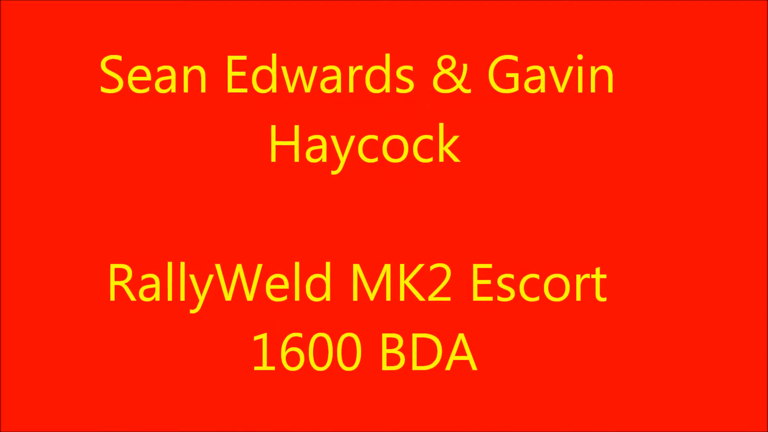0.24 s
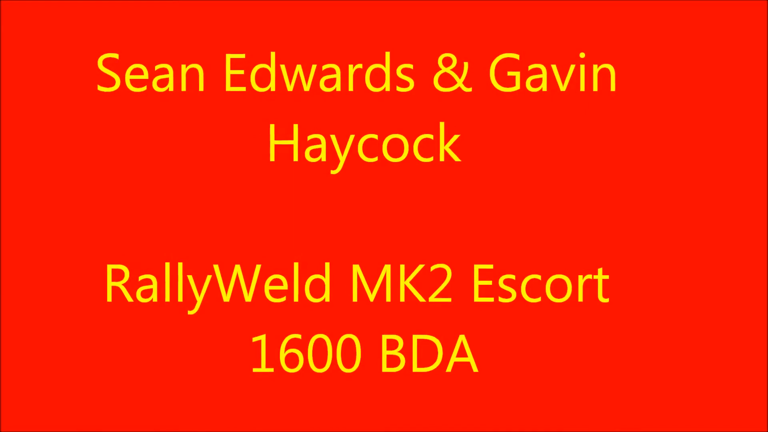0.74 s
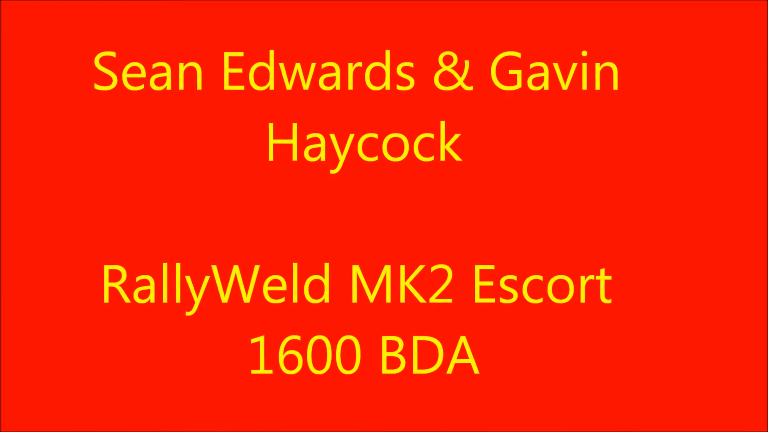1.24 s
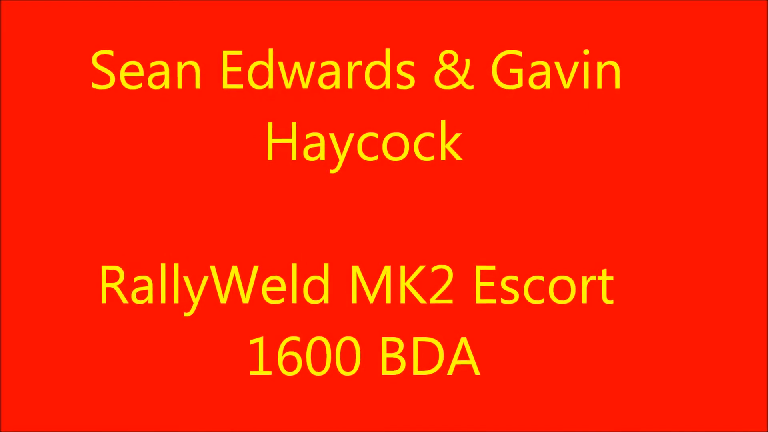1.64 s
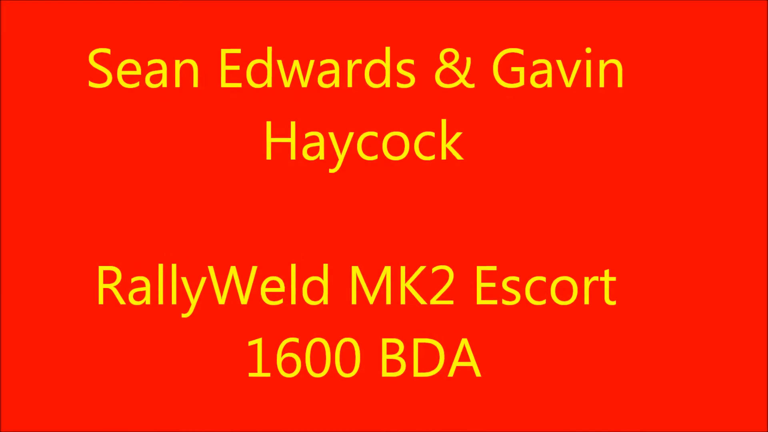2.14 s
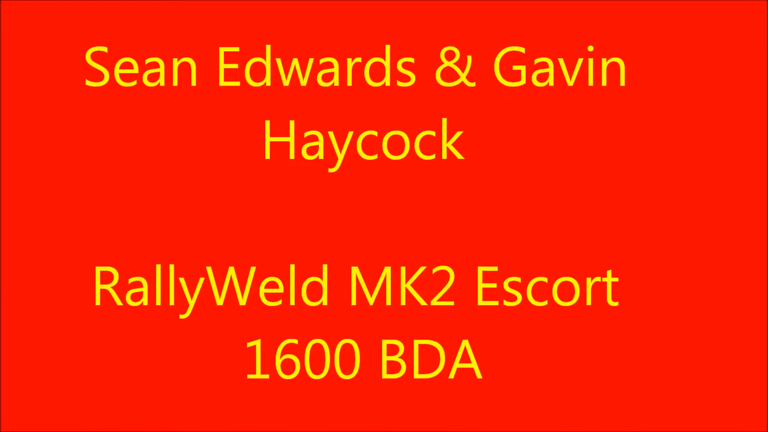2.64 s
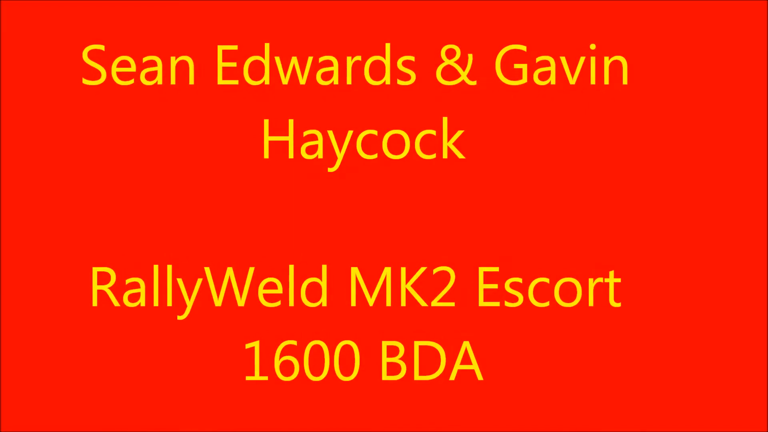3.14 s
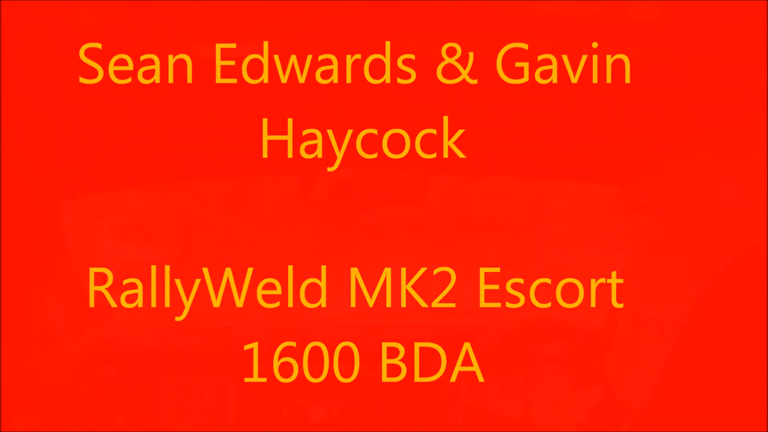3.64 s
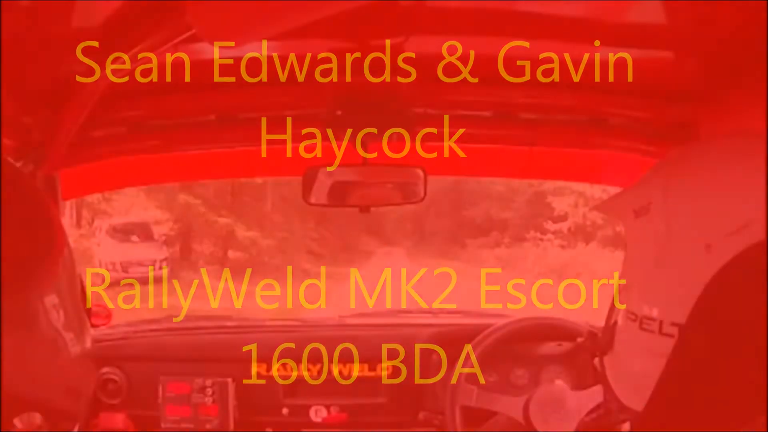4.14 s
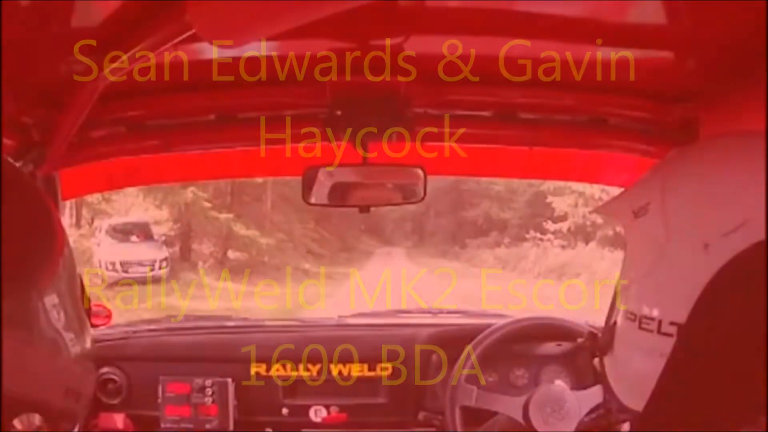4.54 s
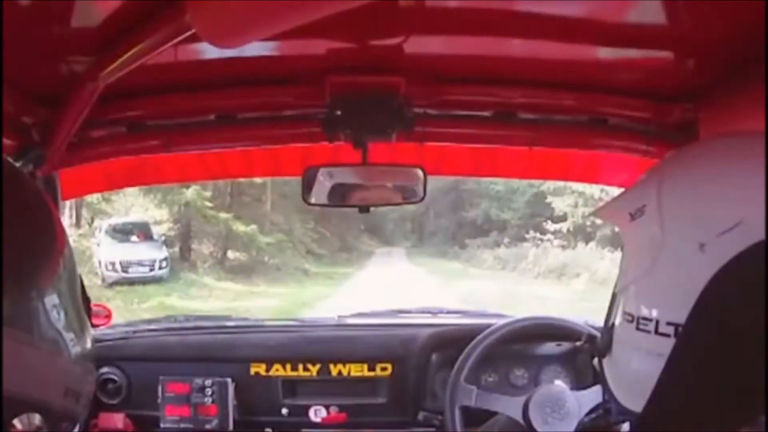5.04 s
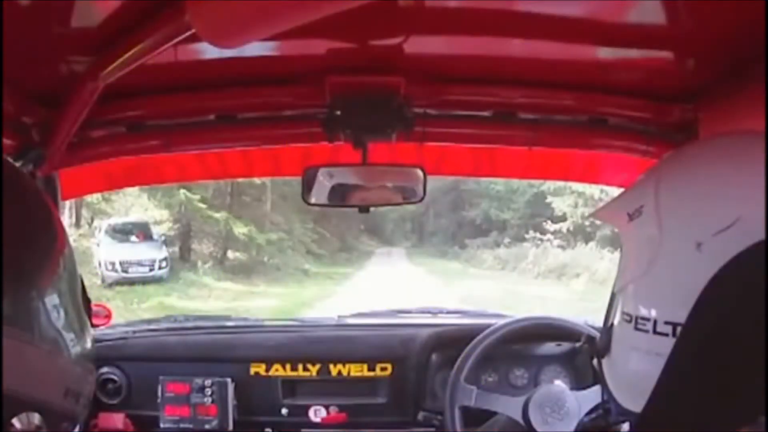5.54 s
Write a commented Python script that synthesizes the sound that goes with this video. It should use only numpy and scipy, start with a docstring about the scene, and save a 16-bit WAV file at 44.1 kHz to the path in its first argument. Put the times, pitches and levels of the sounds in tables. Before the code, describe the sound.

From the first instant a four-cylinder competition engine is at full load, heard inside a bare, resonant metal cabin. Over about four seconds its pitch climbs by more than an octave in one unbroken gear, wavering and surging slightly as the wheels slip. The growl is throaty and uneven, topped by a bright intake rasp. Thin gear tones sing mostly between 0.4 and 1.5 s, and one faint tick comes at 0.4 s. Gravel hiss grows with speed, with a stronger spray around 3.7 to 4 s. From about 4.4 s the run drops away rapidly, vanishing by 5 s, while a standing car fades in: duller, lower, rougher and boomy. The throttle is blipped at 4.4 to 4.7 s and higher at 5.0 to 5.3 s, with short bright hisses and soft low thuds around them. The revs then sink with a burbling boom near 5.6 s over low body rumble.

```python
"""Inside a stripped rally car, a four-cylinder engine pulls hard through one long gear.
Its note and growl are tones locked to the crank; timing gears sing, and coloured noise makes intake rasp and gravel hiss.
That run fades into the car standing at the start, where the throttle is blipped twice.
There the engine shakes cabin resonances, which gives a duller, rougher note with a boom.
Low body rumble, a few thuds, short bright hisses and one tick complete the sound."""
import sys
import numpy as np
from scipy import signal
from scipy.fft import rfft, irfft
from scipy.io import wavfile

SR = 44100
rng = np.random.default_rng(int(sys.argv[2]) if len(sys.argv) > 2 else 0)


def dump(signal):
    """Clip the signal to [-1, 1] and save it as 16-bit WAV at the path in sys.argv[1]."""
    limited = np.clip(np.atleast_2d(signal).T, -1, 1)
    pcm = np.round(limited * 32767).astype(np.int16)
    wavfile.write(sys.argv[1], SR, pcm)


N = 256220
T = np.arange(N) / SR  # time in seconds
BINS = np.fft.rfftfreq(N, 1 / SR)  # frequencies in Hz

# Layers that follow the revs are pairs: dB at this many firings per second, dB gained per doubling of the revs.
MID_REVS_HZ = 200
ROAR, KNOCK, CLATTER, GRAVEL = (-33, -2), (-43, .5), (-30.5, 0), (-47.5, 18.7)
BLIP_GROWL, RAGGED, IDLE_CLATTER = (-27, 9.2), (-39.5, 2.3), (-45.5, 3.3)


# Loudness of the whole run as it fades out. Each row: time in seconds, level in dB.
RUN_LEVEL = [(0, -1), (2.6, 0.5), (3.7, -1.5), (3.98, 3), (4.36, -4.5), (4.64, -4.5), (4.76, -21),
             (5.0, -73)]


def stage_engine(speed, firings, low_cut_hz=92):
    """The engine at full load: its deep layers waver together, and the rasp and knocks lie on top."""
    engine = stage_note(speed, firings) + stage_growl(speed, firings) + roar(speed, firings)
    engine = engine + from_db(1.0) * gear_whine(firings, flutter=.68, chatter=.45, lope=.4)
    # ruts jolt the driven wheels, so the load wavers
    engine = engine * from_db(.55 * drift(8))
    low_cut = signal.butter(6, low_cut_hz, "high", fs=SR, output="sos")
    engine = signal.sosfilt(low_cut, engine)
    knocks = with_revs(speed, KNOCK) * knock(firings)
    return from_db(in_time(RUN_LEVEL)[0]) * (engine + knocks + intake_rasp(speed, firings))


# Harmonics of the firing pulse. Each row: multiple of the firing rate, level in dB before the pipe.
PULL_HARMONICS = [(1.0, -6.0), (2.0, -7.5), (3.0, 2.5), (4.0, -4.5)]
# How strongly the exhaust pipe passes each pitch. Each row: frequency in Hz, level in dB.
PIPE_CURVE = [(115.0, -20), (150.0, -22), (200.0, -15), (228.0, -26.5), (252.0, -15.5), (280.0, -22.0),
              (310.0, -20.0), (350.0, -26), (400.0, -30.5), (490.0, -22), (535.0, -23.5), (590.0, -36),
              (645.0, -27.5), (700.0, -38), (780.0, -43), (840.0, -43.5), (920.0, -36.5), (1100.0, -42.5)]


def stage_note(speed, firings):
    """Firing harmonics sweep through the resonances of the exhaust pipe, with a rough edge."""
    note = partials(speed, firings, PULL_HARMONICS, PIPE_CURVE, unsteady=.15, scatter=.8)
    return note * (1 + .11 * drift(33))


# Growl of unequal cylinders during the run. Each row: time in seconds, level in dB.
GROWL_LEVEL = [(0.0, -21.5), (0.6, -29), (1.0, -26.5), (1.5, -19.5), (2.1, -22.5), (2.6, -23.5),
               (3.0, -18.5), (3.5, -22.5), (3.9, -35.0), (4.4, -38.5)]
# Tones in that growl. Each row: multiple of the firing rate, level in dB before the cabin.
GROWL_TONES = [(0.75, 3.5), (1.25, 7.0), (1.5, -2), (1.75, 13.0), (2.25, 4.5), (2.5, -14), (2.75, -0.5),
               (3.25, 0), (3.5, 3), (3.75, 0.5), (4.25, 1.0), (4.5, -4), (4.75, -3), (5.0, -8.5),
               (5.25, -1.5), (5.5, 0), (5.75, -6.0), (6.0, -16), (6.25, -5), (6.5, -8.5), (6.75, -9.5),
               (7.0, -12)]
# How strongly the cabin passes these tones as they sweep. Each row: frequency in Hz, level in dB.
CABIN_CURVE = [(85.0, -33), (130.0, -25.0), (205.0, -23), (225.0, -20.5), (255.0, -7.5), (285.0, -11),
               (310.0, -22), (340.0, -12), (400.0, -31.5), (440.0, -23.5), (480.0, -28), (530.0, -13.5),
               (570.0, -16.5), (620.0, -15.5), (680.0, -13.5), (780.0, -20.5), (900.0, -38),
               (1070.0, -11.5), (1250.0, -28), (1400.0, -35), (1700.0, -35.0)]


def stage_growl(speed, firings):
    """Unequal cylinders repeat once per engine cycle, which adds tones mostly between the firing harmonics."""
    tones = partials(speed, firings, GROWL_TONES, CABIN_CURVE, unsteady=.15, scatter=.85)
    return from_db(in_time(GROWL_LEVEL)[0]) * tones


# Extra swells and sags of single tones during the run.
# Each row: middle in seconds, half length in seconds, multiple of the firing rate, change in dB.
RUN_SWELLS = [(0.04, 0.11, 4.5, 8.2), (0.11, 0.16, 5.0, 15), (0.15, 0.08, 4.0, 5), (0.23, 0.41, 4.25, 13.6),
              (0.24, 0.24, 4.75, 13), (0.35, 0.15, 1.75, -13), (0.36, 0.67, 3.25, 17.5),
              (0.51, 0.8, 3.75, 14), (0.58, 0.15, 1.0, 4), (0.82, 0.55, 2.75, 16.5),
              (0.87, 0.6, 3.0, -25.5), (0.91, 0.39, 4.25, -16.5), (1.59, 0.13, 3.25, -8),
              (1.93, 0.11, 5.5, 4.5), (1.96, 0.16, 3.0, -8), (1.99, 0.53, 1.75, -16.5),
              (2.15, 0.15, 6.25, 13), (2.15, 0.16, 2.25, 10), (2.2, 0.16, 3.75, 8), (2.35, 0.25, 3.0, 1.5),
              (2.44, 0.22, 2.0, -24), (2.46, 0.15, 1.0, 4.5), (2.51, 0.18, 4.0, 8), (2.55, 0.3, 2.75, 10.5),
              (2.85, 0.27, 5.25, 14.5), (2.98, 0.31, 1.5, -21), (3.13, 0.11, 4.25, -13.5),
              (3.13, 0.16, 1.75, -18.1), (3.35, 0.33, 2.5, 10.8), (3.66, 0.077, 2.75, 13.2),
              (3.76, 0.081, 2.0, 8), (3.93, 0.073, 1.0, 4), (4.09, 0.031, 2.0, -8),
              (4.1, 0.095, 0.75, -14.5), (4.15, 0.51, 0.75, 21), (4.26, 0.055, 1.0, 7.1),
              (4.3, 0.26, 3.0, 13), (4.34, 0.15, 2.0, 7.5), (4.41, 0.05, 1.0, -15)]


def partials(speed, firings, orders, response, unsteady, scatter):
    """Tones locked to the crank rise and fall as they sweep through a response; near-equal phases make a throb."""
    hz, response_db = np.transpose(response)
    out = 0
    for multiple, db in orders:
        multiple = np.round(4 * multiple) / 4  # whole turns per four-firing cycle
        level = db + np.interp(np.log(multiple * speed), np.log(hz), response_db)
        level = level + swells_of(RUN_SWELLS, multiple)
        gain = from_db(level) * (1 + unsteady * drift(10.0))
        phase = scatter * rng.standard_normal()
        out = out + gain * np.cos(2 * np.pi * multiple * firings + phase)
    return out


# Tone colour of the roar. Each row: frequency in Hz, strength in dB per Hz.
ROAR_TINT = [(70, -18), (115, -7), (170, -7), (260, 0), (400, -9.5), (550, -0.5), (750, -3), (880, -8),
             (1080, -3), (1400, -7), (1900, -24)]


def roar(speed, firings):
    """Repeating shocks and rushing air, the roar that the engine pushes through the floor."""
    return with_revs(speed, ROAR) * clatter(firings, ROAR_TINT, regular=1.0, pulsing=0.27, lope=0.15)


# Tone colour of the rasp. Each row: frequency in Hz, strength in dB per Hz.
RASP_TINT = [(900, -27.5), (1300, -12.5), (1620, -9), (2000, -6), (2400, -2.5), (2830, -6.5), (3300, -1),
             (3600, 1), (4300, -8.5), (4900, -12), (5600, -17.5), (6800, -40.5)]


def intake_rasp(speed, firings):
    """Bright repeating shocks and rushing air that pulse with the strokes, with an unsteady level."""
    rasp = clatter(firings, RASP_TINT, regular=.75, pulsing=.14, lope=.1)
    return with_revs(speed, CLATTER) * rasp * from_db(0.68 * drift(7.6))


# Gear tones that swell and pass, with levels before the engine's shared gain.
# Each row: middle in seconds, spread (standard deviation) in seconds, multiple of the firing rate, level in dB.
GEAR_TONES = [(.6, 0.064, 24, -33.5), (0.72, 0.032, 24, -30.5), (0.46, 0.061, 25, -35),
              (0.87, 0.057, 23.75, -38), (0.79, .04, 24.5, -35.5), (1.06, .05, 23.75, -38),
              (1.15, 0.26, 24, -39.5), (.85, .16, 23.25, -36.5), (1.2, 0.044, 25.5, -42),
              (1.46, 0.048, 21, -35), (1.2, .2, 21, -46.5), (0.22, 0.18, 24, -44.5),
              (.96, .15, 12.25, -40.5), (0.62, 0.29, 18.4, -38.5), (3.12, .12, 8.5, -37.5),
              (0.32, .1, 8.5, -42), (2.4, 0.063, 8.5, -44.5)]


def gear_whine(firings, flutter, chatter, lope):
    """Tooth tones swell in turn; backlash and the uneven strokes shake the high ones most."""
    out = 0
    highest = max(row[2] for row in GEAR_TONES)
    for s, spread, multiple, db in GEAR_TONES:
        shake = multiple / highest
        strokes = 1 + shake * lope * np.cos(np.pi * firings / 2 + drift(1.5))
        rise_and_fall = np.exp(-((T - s) / spread) ** 2 / 2)
        gain = from_db(db) * rise_and_fall * (1 + shake * chatter * drift(54)) * strokes
        tone = np.cos(2 * np.pi * multiple * firings + shake * flutter * drift(44))
        out = out + gain * np.sqrt(2) * tone
    return out


# The short thud of the strongest cylinder. Each row: resonance in Hz, width in Hz, level in dB before scaling.
THUD_RESONANCES = [(293, 150, 4), (666, 73, -1)]


def knock(firings):
    """Every fourth firing strikes the exhaust harder and rings out within a few milliseconds."""
    strikes = np.diff(np.floor(firings / 4), prepend=0)
    band = signal.butter(2, [170, 950], "band", fs=SR, output="sos")
    return rms_one(signal.sosfilt(band, resonate(strikes, THUD_RESONANCES)))


def clatter(firings, colour, regular, pulsing, lope):
    """Shocks that repeat each cycle, slowly changing, mixed with rushing air; both pulse with the strokes."""
    change = drift(0.99)  # blends slowly between two shock patterns
    repeating = np.cos(change) * cycle_pattern(firings) + np.sin(change) * cycle_pattern(firings)
    strokes = 1 + pulsing * np.cos(2 * np.pi * firings) + lope * np.cos(np.pi * firings)
    shocks = regular * coloured(cabin(repeating), colour)
    return rms_one((shocks + noise(colour)) * strokes)


def cycle_pattern(firings, size=512):
    """A fixed run of small random shocks that comes round with every engine cycle of four firings."""
    pattern = signal.resample(rng.standard_normal(size // 2), 16 * size)
    place = np.arange(len(pattern)) / len(pattern)
    return rms_one(np.interp(firings / 4 % 1, place, pattern))


def cabin(x, t60_s=0.096, wet=1):
    """Dense short echoes off bare panels: each tone flares and fades as it sweeps across their many peaks."""
    t = np.arange(SR // 5) / SR
    echoes = rng.standard_normal(len(t)) * from_db(-60 * t / t60_s)
    echoes = echoes / np.sqrt(np.sum(echoes ** 2))
    return x + wet * signal.fftconvolve(x, echoes)[:N]


# The standing car fades in. Each row: time in seconds, gain as a plain factor.
START_GAIN = [(3.75, 0.12), (4.25, 0.25), (4.55, 0.62), (5.15, 1)]
THROTTLE_LAG_S, THROTTLE_NOTE_DB, THROTTLE_RAGGED_DB, THROTTLE_CLATTER_DB = 0.074, 2.5, 6, 6


def blipped_engine(speed, firings, throttle, top_hz=790):
    """Without load the charges burn unevenly and shake the cabin, most on the throttle and on the overrun."""
    # after the last blip, unburnt charges burble in the pipe
    burble = from_db(7.5 * swell(5.59, half_length=0.13))
    note = exhaust_note(firings, rough=.2, waver_db=.8)
    growl_gain = with_revs(speed, BLIP_GROWL) * np.sqrt(burble)
    uneven = blip_growl(firings, growl_gain, unsteady=0.6, scatter=0.81)
    top_cut = signal.butter(8, top_hz, fs=SR, output="sos")
    tone = signal.sosfilt(top_cut, note + uneven) * from_db(THROTTLE_NOTE_DB * throttle)
    ragged = ragged_burning(speed, firings, throttle) * burble
    mix = tone + overrun_boom(firings) + ragged + standing_rasp(speed, firings, throttle)
    return in_time(START_GAIN)[0] * mix


# Throttle blips. Each row: opens in seconds, closes in seconds, firings per second reached.
THROTTLE_BLIPS = [(4.39, 4.69, 206), (5.04, 5.33, 264)]
# Revs sinking before the first blip. Each row: time in seconds, firings per second.
SINKING_REVS = [(4.1, 139), (4.36, 118)]
COAST_DRAG_PER_S = .67  # rate at which friction takes the revs back


def blip_controls():
    """Revs climb while the throttle is open and coast down when it shuts; the throttle's effect (0-1) lags."""
    speed, throttle = in_time(SINKING_REVS)[0], np.zeros(N)
    for opens, closes, top in THROTTLE_BLIPS:
        climb = np.interp(T, [opens, closes], [np.interp(opens, T, speed), top])
        coast = np.exp(-COAST_DRAG_PER_S * np.maximum(T - closes, 0))
        speed = np.where(T < opens, speed, climb * coast)
        throttle += (T > opens) & (T < closes)
    r = np.exp(-1 / (THROTTLE_LAG_S * SR))
    return speed, signal.lfilter([1 - r], [1, -r], throttle)


# Harmonics of the standing engine. Each row: multiple of the firing rate, level in dB before the cabin.
STANDING_HARMONICS = [(1, -16.5), (2, -24), (3, -26)]
# Brief swells and sags of single harmonics.
# Each row: middle in seconds, half length in seconds, multiple of the firing rate, change in dB.
STANDING_SWELLS = [(4.67, 0.068, 1, -8), (4.84, 0.064, 1, -14), (5.0, .07, 1, 3.5), (5.29, .04, 1, 2.5),
                   (5.48, 0.05, 1, 0), (5.68, .04, 1, 6.5), (4.51, 0.049, 2, 13.5), (4.87, 0.084, 2, 0),
                   (5.14, 0.043, 2, 6), (5.33, 0.096, 2, -3), (5.5, .06, 2, 4.5), (5.2, 0.15, 3, -3.5),
                   (5.51, 0.043, 3, 11)]
# Cabin resonances of the standing car, also used by the two functions after this one.
# Each row: frequency in Hz, width in Hz, level in dB.
CABIN_RESONANCES = [(55.0, 5.3, -26.5), (128, 4.9, -9), (167, 25, -14.5), (240, 51, -10), (369, 23, -6.5),
                    (469, 31, -7.5), (712, 61, -11)]


def exhaust_note(firings, rough, waver_db):
    """Firing harmonics swell as they cross cabin resonances; higher ones waver more, and the level is rough."""
    note = 0
    for multiple, db in STANDING_HARMONICS:
        level = db + swells_of(STANDING_SWELLS, multiple) + waver_db * multiple * drift(5.2)
        note = note + from_db(level) * np.cos(2 * np.pi * np.round(multiple) * firings)
    return resonate(note, CABIN_RESONANCES) * (1 + rough * drift(30))


# Tones of the standing growl. Each row: multiple of the firing rate, level in dB before gain and cabin.
STANDING_GROWL_TONES = [(0.25, -20), (0.5, -4.5), (0.75, -4.5), (1.25, 0), (1.5, -11), (1.75, -10),
                        (2.25, -4), (2.5, -9), (2.75, -14.5), (3.25, -6), (3.5, 2), (3.75, -5), (4.0, 0)]


def blip_growl(firings, gain, unsteady, scatter):
    """An odd cylinder pulses once per cycle: tones mostly between the harmonics sweep through the resonances."""
    tones = 0
    for multiple, db in STANDING_GROWL_TONES:
        per_cycle = np.round(4 * multiple)
        level = from_db(db) * (1 + unsteady * drift(4.0))
        phase = scatter * rng.standard_normal()
        tones = tones + level * np.cos(2 * np.pi * per_cycle * firings / 4 + phase)
    return resonate(tones * gain, CABIN_RESONANCES)


def ragged_burning(speed, firings, throttle):
    """Uneven burning as flickering puffs of noise that pulse with each firing and shake the cabin."""
    puffs = rng.standard_normal(N) * (1 + .3 * np.cos(2 * np.pi * firings)) * from_db(2.5 * drift(45))
    # tone colour: frequency in Hz, strength in dB
    tint = [(30, -12.5), (100, -7.5), (300, -2.0), (700, -1.0), (1000, -6), (2000, -25.5)]
    ragged = coloured(resonate(puffs, CABIN_RESONANCES), tint)
    return ragged * with_revs(speed, RAGGED) * from_db(THROTTLE_RAGGED_DB * throttle)


def overrun_boom(firings):
    """On the overrun after the last blip, the floor pan booms once per engine cycle."""
    return from_db(-31) * swell(5.65, half_length=0.13) * np.cos(np.pi * firings / 2)


# Tone colour of the standing engine's rasp. Each row: frequency in Hz, strength in dB per Hz.
STANDING_RASP_TINT = [(600, -21), (900, 1.5), (1060, -8.5), (1300, -2), (1750, -11.5), (2400, -9.5),
                      (3800, -5.5), (4900, -14.5), (6500, -23.5), (7800, -65.5), (8300, -38.5)]


def standing_rasp(speed, firings, throttle):
    """A quieter mix of shocks and rushing air that grows when the throttle opens."""
    rasp = clatter(firings, STANDING_RASP_TINT, regular=.3, pulsing=.12, lope=.067)
    return rasp * with_revs(speed, IDLE_CLATTER) * from_db(THROTTLE_CLATTER_DB * throttle)


# Stones spraying into the wheel arches. Each row: middle in seconds, half length in seconds, level in dB.
STONE_SPRAYS = [(1.457, 0.16, -44.5), (2.26, 0.2, -46), (3.732, 0.34, -38.5), (4.025, 0.071, -32.5),
                (4.55, 0.1, -51)]
# Tone colour of the gravel. Each row: frequency in Hz, strength in dB per Hz.
GRAVEL_TINT = [(3800, -1.5), (4700, 6), (5400, 5.5), (6000, 3.5), (6800, 5.5), (7200, -18.5), (7600, -63.5),
               (8200, -43.5)]


def gravel(speed):
    """Grit hisses under the car, louder with speed, with sprays of stones on top."""
    rolling = with_revs(speed, GRAVEL) * from_db(in_time(RUN_LEVEL)[0])
    # separate noises add by power
    power = rolling ** 2
    for s, length, db in STONE_SPRAYS:
        power = power + (from_db(db) * swell(s, length)) ** 2
    return np.sqrt(power) * rms_one(noise(GRAVEL_TINT) * from_db(1.6 * drift(24)))


# Bright puffs of hiss at the start line. Each row: middle in seconds, half length in seconds, level in dB.
HISS_PUFFS = [(4.73, 0.077, -39.5), (4.92, 0.15, -48.5), (5.132, .06, -47.5)]
# Tone colour of the puffs. Each row: frequency in Hz, strength in dB per Hz.
HISS_TINT = [(2500, -20), (4000, 1.5), (5100, 5), (5400, 8), (5750, 1), (6800, 4), (7800, -9.5),
             (8200, -24.5)]


def spits():
    """Short bright hisses that swell and fade."""
    return sum(from_db(db) * swell(s, length) for s, length, db in HISS_PUFFS) * noise(HISS_TINT)


# The body rocks on its mounts. Each row: middle in seconds, frequency in Hz, level in dB.
BODY_THUDS = [(4.729, 32, -32), (4.99, 42, -34.5), (5.36, 30, -28)]


def thuds(half_length=0.046):
    """A few slow swings of the body shell, each a low tone that swells and fades."""
    out = 0
    for s, hz, db in BODY_THUDS:
        out = out + from_db(db) * swell(s, half_length) * np.sin(2 * np.pi * hz * (T - s))
    return out


def tick(s=0.4, db=-29):
    """One thin, bright tick: a single sharp click."""
    return from_db(db) * (np.arange(N) == int(s * SR))


# Body rumble, dying away at speed and returning at the start line. Each row: time in seconds, level in dB.
RUMBLE_LEVEL = [(0, -40), (.7, -46.5), (1.5, -47), (2.4, -54), (2.7, -67), (3.0, -60), (3.7, -60),
                (4.25, -46), (4.55, -48.5), (5.1, -44.5), (5.81, -41.5)]
# Tone colour of the rumble. Each row: frequency in Hz, strength in dB per Hz.
RUMBLE_TINT = [(12, -14.5), (28, -2.5), (45, 3), (70, 2.5), (100, 5), (160, -2)]


def body_rumble():
    """Low noise of the body whose level wavers slowly."""
    return from_db(in_time(RUMBLE_LEVEL)[0] + 2.8 * drift(2.3)) * noise(RUMBLE_TINT)


def crank(speed, jitter):
    """Firings counted so far; each comes a little early or late."""
    return np.cumsum(speed) / SR + jitter * drift(64)


def with_revs(speed, law):
    """Gain of a layer that grows or shrinks with engine speed."""
    db, db_per_doubling = law
    return from_db(db + db_per_doubling * np.log2(speed / MID_REVS_HZ))


def swell(s, half_length):
    """A smooth rise and fall around a moment, height 1, down to 0.37 one half length away."""
    return np.exp(-((T - s) / half_length) ** 2)


def swells_of(rows, multiple):
    """Summed rise and fall in dB of one tone."""
    mine = [row for row in rows if round(4 * row[2]) == round(4 * multiple)]
    return sum(db * swell(s, length) for s, length, _, db in mine)


def resonate(x, modes):
    """Parallel resonances with alternating signs."""
    out = 0
    for k, (hz, width, db) in enumerate(modes):
        r = np.exp(-np.pi * abs(width) / SR)  # a wider resonance dies away faster
        poles = [1, -2 * r * np.cos(2 * np.pi * hz / SR), r * r]
        zeros = np.array([1, 0, -1]) * (1 - r * r) / 2
        out = out + (-1) ** k * from_db(db) * signal.lfilter(zeros, poles, x)
    return out


def coloured(x, spectrum):
    """Weight a sound's frequencies by a curve in dB; rms 1."""
    hz, db = np.transpose(spectrum)
    shape = np.interp(np.log(BINS + 1), np.log(hz), db, left=-80, right=-80)
    return rms_one(irfft(rfft(x) * from_db(shape), N))


def noise(spectrum):
    """Coloured noise, rms 1."""
    return coloured(rng.standard_normal(N), spectrum)


def drift(rate):
    """Slow random wandering with spread 1; a higher rate in Hz wanders faster."""
    step = 40  # computed at every 40th sample, then joined by straight lines
    r = np.exp(-2 * step * np.pi * rate / SR)
    slow = signal.lfilter([1], [1, -2 * r, r * r], rng.standard_normal(N // step + 2002))[2000:]
    return np.interp(np.arange(N) / step, np.arange(len(slow)), rms_one(slow))


def in_time(rows):
    """Each column of a curve at every sample."""
    s, *columns = np.transpose(rows)
    return [np.interp(T, s, c) for c in columns]


def from_db(db):
    """Decibels to gain."""
    return 10 ** (np.asarray(db) / 20)


def rms_one(x):
    """Scale to unit rms."""
    return x / np.sqrt(np.mean(x ** 2) + 1e-20)


# Pulling on the stage, surging as the tyres slip and grip. Each row: time in seconds, firings per second.
PULLING_SPEED = [(0.0, 111), (0.109, 120.6), (0.435, 128.6), (0.544, 137), (0.639, 135.2), (0.735, 143.7),
                 (0.816, 148), (0.884, 146.8), (0.993, 151.5), (1.102, 157), (1.197, 160), (1.252, 161),
                 (1.415, 171.1), (1.524, 168), (1.633, 180.4), (1.714, 179.7), (1.823, 189), (1.891, 199),
                 (1.959, 197), (2.014, 193), (2.095, 200), (2.163, 209), (2.245, 200.5), (2.327, 211),
                 (2.49, 216), (2.531, 216), (2.626, 219), (2.803, 237), (2.912, 234.8), (2.993, 240),
                 (3.102, 246.9), (3.184, 248.9), (3.306, 257.7), (3.361, 264.2), (3.497, 266),
                 (3.646, 275.4), (3.782, 277), (3.918, 280), (3.973, 284.0), (4.082, 265), (4.109, 272),
                 (4.136, 274.6), (4.19, 282), (4.313, 281), (4.381, 267), (4.49, 276)]


def scene():
    """The run fades into the start line."""
    pulling, = in_time(PULLING_SPEED)
    revving, throttle = blip_controls()
    run = stage_engine(pulling, crank(pulling, jitter=0.0017)) + gravel(pulling)
    start = blipped_engine(revving, crank(revving, jitter=0.0055), throttle) + spits() + thuds()
    return (run + start + body_rumble() + tick())[None]


def record(dry, fade_in_s=.004, cutoff_hz=15500):
    """The sound starts softly and the top is cut."""
    top_cut = signal.cheby2(16, 60, cutoff_hz, fs=SR, output="sos")
    return signal.sosfilt(top_cut, dry * np.minimum(T / fade_in_s, 1))


dry = scene()
out = record(dry)
dump(out)
```